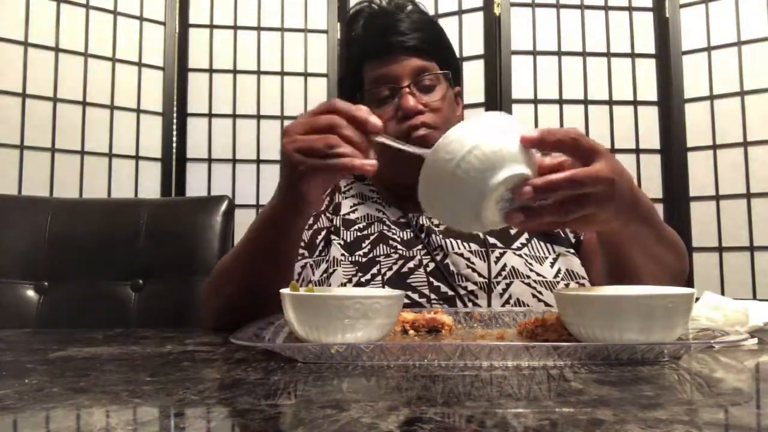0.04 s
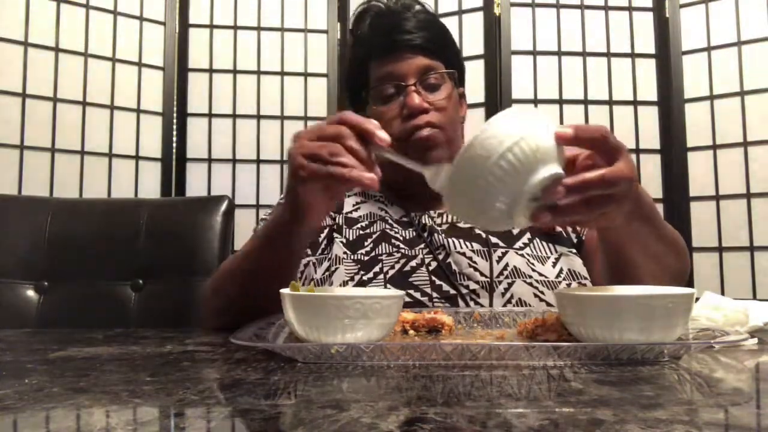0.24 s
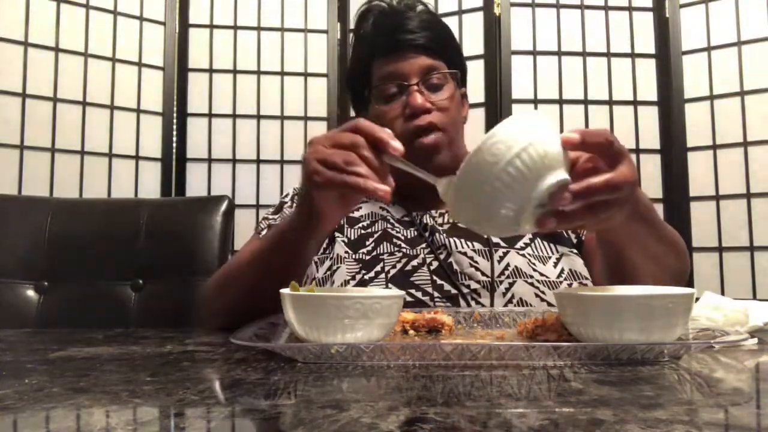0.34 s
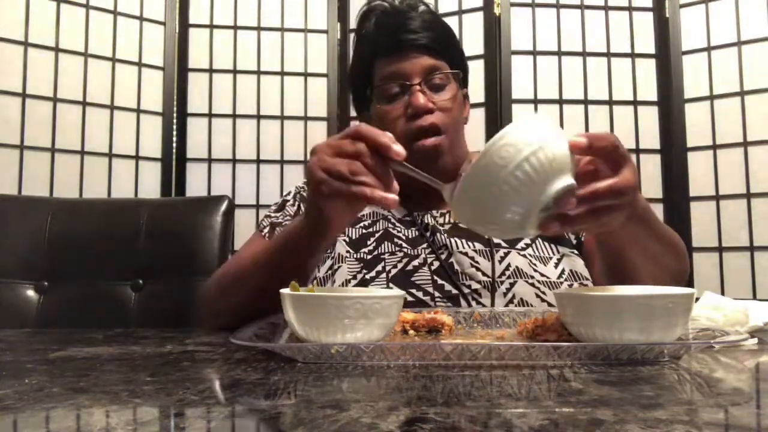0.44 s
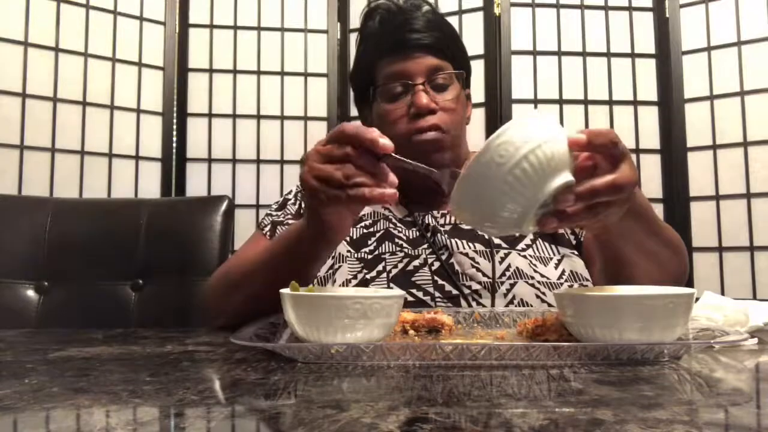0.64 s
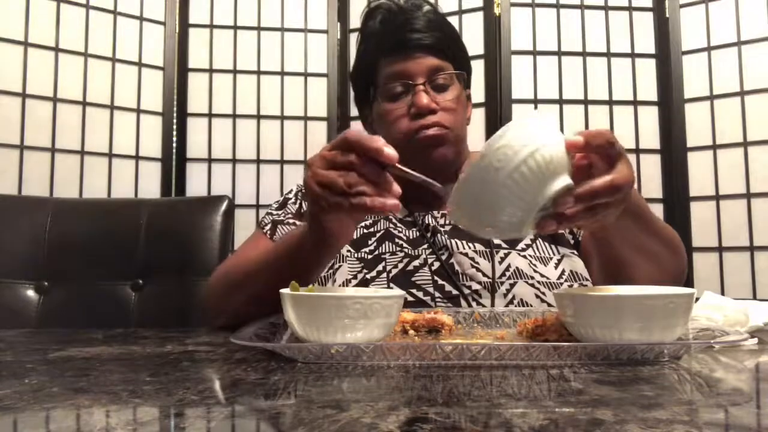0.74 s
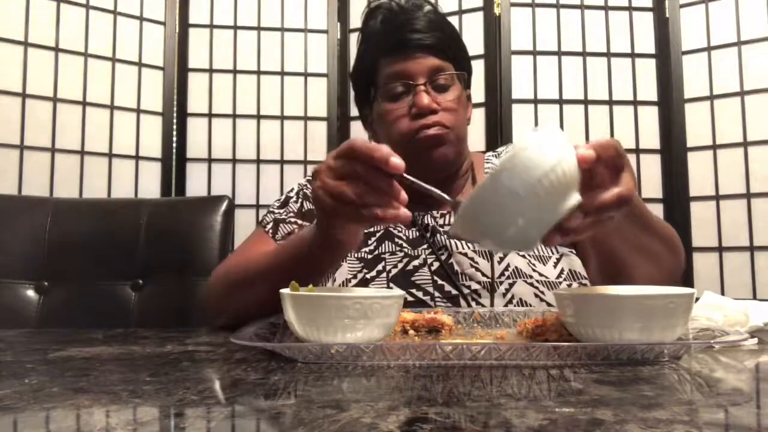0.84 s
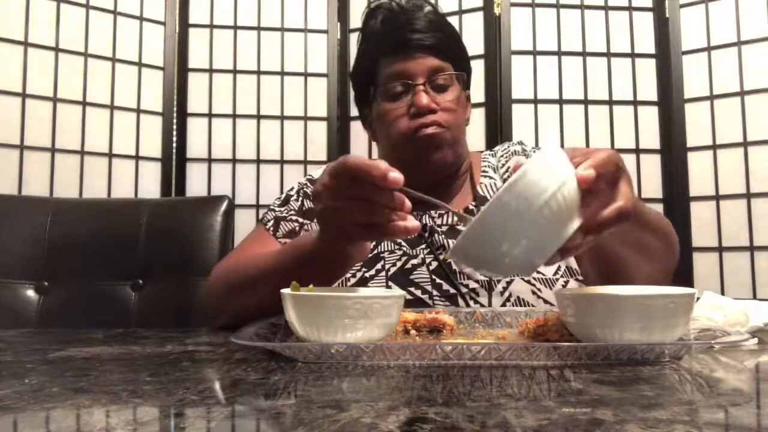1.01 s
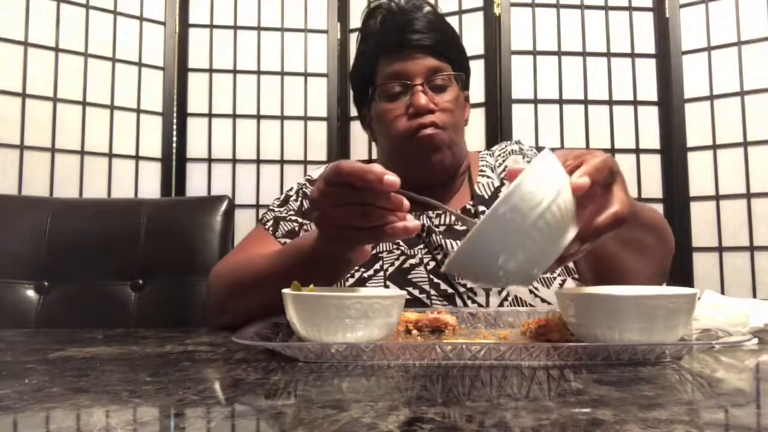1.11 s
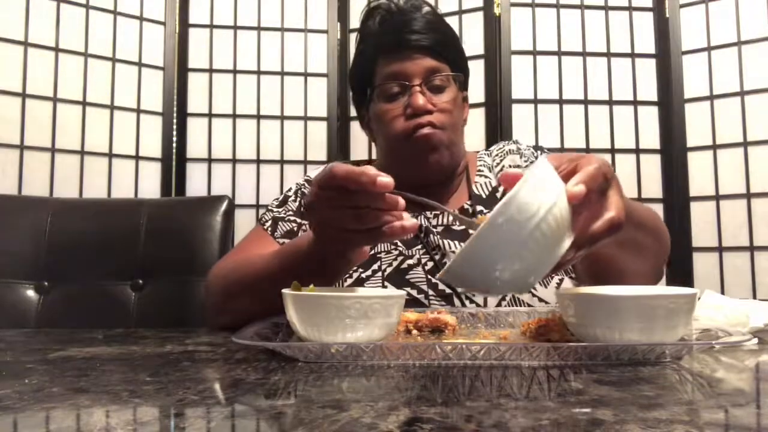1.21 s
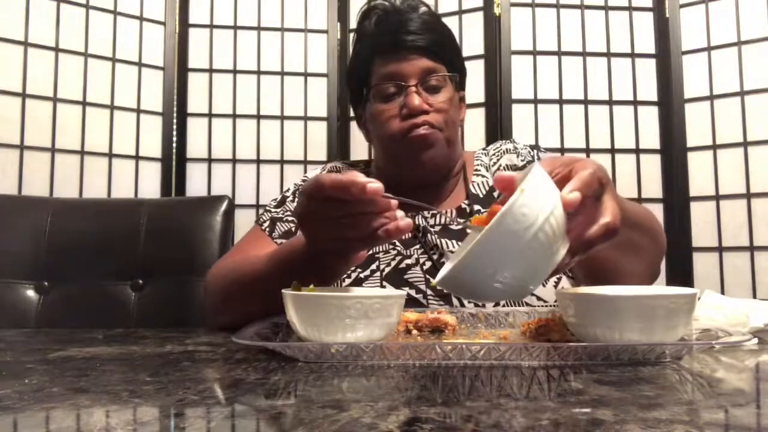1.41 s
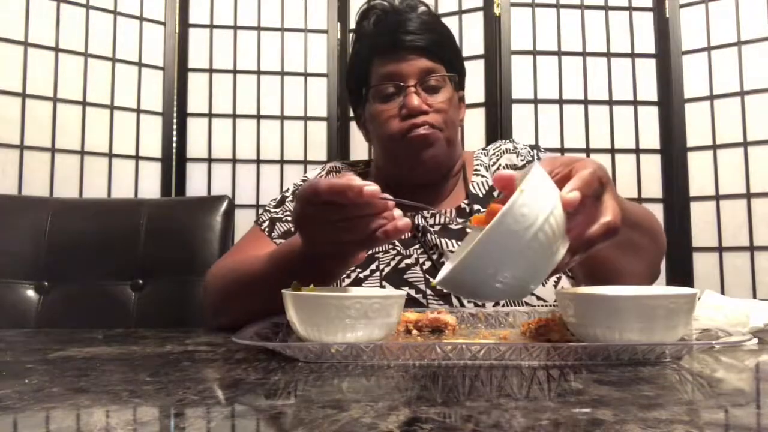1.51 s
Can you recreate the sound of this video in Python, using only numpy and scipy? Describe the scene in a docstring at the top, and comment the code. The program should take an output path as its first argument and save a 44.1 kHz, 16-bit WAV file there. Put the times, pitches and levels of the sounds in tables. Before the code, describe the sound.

A steel fork clinks and scrapes in a ceramic bowl of soft food. A soft rub leads to a bright, quickly damped double clink at 0.2 seconds, then a light scrape and a wet knock near 0.4. Clinks come at 0.6 and 0.95, with a sharp tick between. Faint scrapes, squeaks and taps finish around 1.3 seconds. A low fan hum fills the small room throughout.

```python
"""A steel fork scoops soft food from a hand-held ceramic bowl in a small room.
A soft rub leads to a bright double clink at 0.2 s; the hand damps the bowl's ring quickly.
A light scrape follows, then at 0.43 s the tines tick and knock through the food with a wet crackle.
More rubs, clinks at 0.6 and 0.95 s and a sharp tick between; faint scrapes, squeaks and taps end it.
Throughout, the room carries each contact on over air noise and the low hum of a ventilation fan."""
import sys
import numpy as np
from scipy import signal
from scipy.fft import rfft, irfft
from scipy.io import wavfile

SR = 44100
rng = np.random.default_rng(int(sys.argv[2]) if len(sys.argv) > 2 else 0)


def put_to_file(sound):
    """Save the sound as 16-bit audio at rate SR, in the file named by the first command-line argument."""
    columns = np.atleast_2d(sound).T  # one column per channel
    safe = np.clip(columns, -1, 1)
    whole_steps = np.round(safe * 32767)
    wavfile.write(sys.argv[1], SR, whole_steps.astype(np.int16))


N = 68355
T, FREQS = np.arange(N) / SR, np.fft.rfftfreq(N, 1 / SR)
CONTACT_T = T[:SR // 4]

# fork on bowl: t/s, 6 x gain/dB at FAMILY_HZ, decay scale, crack level/dB, crack cut-off/Hz
CLINKS = [(0.216, -16.5, -13, -12, -20.5, -23.5, -19, 0.96, -15, 16600),
          (0.2192, -28, -20.5, -22, -20, -24, -31, 0.67, -26, 16300),
          (0.3132, -50, -36.5, -37, -33, -51, -60, 0.62, -54, 9000),
          (0.3376, -57, -35, -42, -32, -52, -55, 0.41, -39.5, 10800),
          (0.6124, -22, -29, -40, -20, -40.5, -44, 0.51, -25.5, 5200),
          (0.7819, -30.5, -45.5, -60, -39, -56.5, -57, 0.79, -41.5, 9000),
          (.9528, -23, -28.5, -27.5, -22.5, -32.5, -44, 0.45, -21, 4500),
          (1.233, -56, -58, -66, -58, -63, -73, 0.83, -43, 4300),
          (1.2839, -43, -44, -48, -46.5, -50, -54, 0.64, -37, 4900),
          (1.3263, -59, -50.5, -65, -58, -61, -64, 1, -50, 4480)]
# contact crack spectrum: f/Hz, gain/dB
CRACK_EQ = [(300, -37.5), (800, -1), (1250, -10), (1600, -4), (2700, 4.5), (3150, -6.5), (4000, 3.5),
            (5500, 0.5), (8300, -3), (12500, 0), (16000, -14)]
def clinks(crack_t60_s=.026):
    """Each blow cracks and rings the bowl; food dulls the crack and shortens the ring."""
    out = np.zeros(N)
    for start, *family_db, decay_scale, crack_db, cut_hz in CLINKS:
        crack = burst(crack_db, crack_t60_s * decay_scale, CRACK_EQ)
        dulling = 1 / np.sqrt(1 + (FREQS / cut_hz) ** 6)
        out += at(start, bowl(decay_scale, family_db) + colour(crack, dulling))
    return out


# bowl modes: f/Hz
BOWL_HZ = [1665, 2480, 3812, 3834, 4130, 5314, 5887, 6492, 6660, 6790, 10110, 10450, 11425, 12900, 14190,
           14780]
# per mode: relative level/dB
BOWL_DB = [-2, -17.5, 1, -32.5, -17, -17.5, -15.5, -1.5, -7, 0.5, -0.5, -9.5, -16, -4.5, -4, -0.5]
# per mode: unscaled t60/s
BOWL_T60_S = [0.025, 0.035, 0.041, 0.42, 0.027, .06, .05, 0.058, 0.077, 0.056, 0.047, 0.061, 0.026, 0.029,
              0.039, 0.03]
def bowl(decay_scale, family_db):
    """The hand-damped bowl rings; each contact spot favours other modes."""
    return ring(zip(BOWL_HZ, BOWL_DB, BOWL_T60_S), decay_scale, family_db)


# mode family centres: f/Hz
FAMILY_HZ = [1700, 3800, 6500, 6750, 10000, 14000]
def ring(modes, decay_scale=1, family_db=0, push_s=.00044):
    """Damped modes build up during the push of the contact."""
    favour = list(zip(FAMILY_HZ, np.broadcast_to(family_db, len(FAMILY_HZ))))
    tones = 0
    for hz, db, t60 in modes:
        envelope = undb(db + along(favour, hz)) * fade(t60 * decay_scale)
        tones += envelope * np.sin(2 * np.pi * hz * CONTACT_T)
    return tones * (1 - np.exp(-CONTACT_T / push_s))


# tine ticks: t/s, level/dB
TICKS = [(.3385, -42), (0.434, -33.5), (0.466, -56), (0.671, -50), (0.7824, -21.5)]
# tine modes: f/Hz, relative level/dB, t60/s
TINE_MODES = [(6615, -8.5, 0.016), (7800, -5, 0.0074), (8390, -7, 0.017), (8910, -1, 0.0082),
              (13400, -11, 0.0056), (15100, -6, 0.01)]
def ticks():
    """The tines ping briefly as they flick off the glaze."""
    return sum(at(start, undb(db) * ring(TINE_MODES)) for start, db in TICKS)


# fork through food: t/s, level/dB, thud t60/s
KNOCKS = [(0.4399, -29, 0.025), (0.557, -55.5, 0.015)]
# thud spectrum: f/Hz, gain/dB
THUD_EQ = [(60, -21), (150, -7), (350, 10.5), (750, 1.5), (1150, -4.5), (1700, 0), (2600, -7), (3700, 0),
           (4600, -7.5), (5700, -21), (7500, -14), (16000, -18)]
# hollow ring: f/Hz, relative level/dB, t60/s
KNOCK_MODES = [(405, -11, 0.036), (702, -2, 0.02), (1675, -3.5, 0.014), (2470, -3, 0.025),
               (3326, 2.5, 0.01)]
def knocks():
    """A cushioned blow gives a thud with a short hollow ring."""
    hollow = ring(KNOCK_MODES)
    return sum(at(start, burst(db, t60, THUD_EQ) + undb(db) * hollow) for start, db, t60 in KNOCKS)


# wet crackles: t/s, level/dB, t60/s
CRACKLES = [(.4348, -39, 0.02), (.4390, -30.5, 0.023), (.4645, -46, 0.016)]
# crackle spectrum: f/Hz, gain/dB
CRACKLE_EQ = [(1000, 0.5), (3000, 13), (5800, -33), (7300, 7.5), (11000, 0), (15500, 5)]
def crackles():
    """Wet food crackles in short bright bursts."""
    return sum(at(start, burst(db, t60, CRACKLE_EQ)) for start, db, t60 in CRACKLES)


# fork along glaze: t/s, length/s, level/dB
SCRAPES = [(0.256, 0.14, -55), (0.947, 0.28, -65), (1.238, 0.1, -61)]
# scraped bowl: gain/dB at FAMILY_HZ
SCRAPE_FAMILY_DB = [1, -5, -19.5, -1, -14, -9]
# grit spectrum: f/Hz, gain/dB
GRIT_EQ = [(900, -13.5), (1450, 2.5), (2400, -1), (3100, -0.5), (4200, 2.5), (5500, -6.5), (7300, -3.5),
           (9000, -16), (16000, -27.5)]
def scrapes(slips_per_s=1500, spread_db=4.5, grit_db=1):
    """Uneven tiny slips grate on the glaze and keep the bowl ringing."""
    slipping = rng.random(N) < slips_per_s / SR
    slips = unit(slipping * undb(spread_db * rng.standard_normal(N)))
    pressure = sum(undb(db) * stroke(start, length) for start, length, db in SCRAPES)
    body = bowl(decay_scale=.6, family_db=SCRAPE_FAMILY_DB)
    ringing = signal.fftconvolve(slips * pressure, body / np.linalg.norm(body))[:N]
    grit = undb(grit_db) * pressure * unit(colour(slips, gains(GRIT_EQ)))
    return ringing + grit


# fork pushing food: t/s, length/s, level/dB
RUBS = [(0.011, 0.038, -50.5), (0.532, 0.15, -49.5), (1.051, 0.033, -53.5)]
# rub spectrum: f/Hz, gain/dB
RUB_EQ = [(300, -10), (550, -4), (740, 3.5), (950, -2), (1300, -25.5), (3000, -21), (8000, -51)]
def rubs():
    """Food pushed along the bowl makes a soft hollow rustle."""
    pressure = sum(undb(db) * stroke(start, length) for start, length, db in RUBS)
    return pressure * noise(gains(RUB_EQ))


# tine squeaks: t/s, length/s, f/Hz, level/dB
SQUEAKS = [(0.845, 0.035, 1600, -56), (1.217, 0.11, 1297, -58)]
def squeaks(width_hz=40):
    """The tines squeak briefly in a narrow band."""
    return sum(undb(db) * stroke(start, length) * band(hz, width_hz) for start, length, hz, db in SQUEAKS)


# tail spectrum: f/Hz, gain/dB
ROOM_EQ = [(200, -18), (1000, -16), (2500, -6.5), (4000, -6), (6700, -9.5), (10000, -9), (16000, -3.5)]
# tail decay: f/Hz, t60/s
ROOM_DECAY = [(300, 0.84), (3500, 0.17), (8000, 0.29), (15000, 0.1)]
def room(x, gap_s=.005):
    """Diffuse tail whose treble dies first."""
    centres_hz = np.geomspace(200, 16000, 6)
    t = T[:SR // 2]
    tail, freqs = 0, np.fft.rfftfreq(len(t), 1 / SR)
    for hz in centres_hz:
        share = np.sqrt(along([(c, c == hz) for c in centres_hz], freqs))
        part = irfft(share * np.exp(2j * np.pi * rng.random(len(freqs))), len(t))
        part *= fade(along(ROOM_DECAY, hz), t)
        tail += part / np.linalg.norm(part) * np.sqrt(np.mean(share ** 2))
    return at(gap_s, signal.fftconvolve(x, colour(tail, gains(ROOM_EQ))))


# fan hum: f/Hz, width/Hz, level/dB
HUM_BANDS = [(55.05, 0.75, -64.5), (171.2, 10, -56.5), (218.7, 5.4, -54), (247.8, 4.6, -57.5),
             (371.3, 4, -64)]
def fan():
    """A ventilation fan hums in low wavering bands."""
    return sum(undb(db) * band(hz, width_hz) for hz, width_hz, db in HUM_BANDS)


# air spectrum: f/Hz, gain/dB
AIR_EQ = [(18, -37), (30, -23.5), (98, -9), (227, -2.5), (303, -3), (461, -6.5), (866, -17), (1430, -21),
          (2120, -27), (3670, -29.5), (6050, -37), (6900, -30), (8520, -42), (14400, -44), (16000, -50)]
def air(level_db=-50.5):
    """Soft steady air noise."""
    return undb(level_db) * noise(gains(AIR_EQ))


def undb(db):
    """Decibels to gain."""
    return 10 ** (np.asarray(db) / 20)


def unit(x):
    """Scale to rms 1."""
    return x / (np.std(x) + 1e-18)


def along(points, hz):
    """Interpolate (f/Hz, value) points on a log-frequency axis."""
    p = np.array(points, float)
    return np.interp(np.log(np.maximum(hz, 1)), np.log(p[:, 0]), p[:, 1])


def gains(eq):
    """Linear gain of a spectrum at FREQS."""
    return undb(along(eq, FREQS))


def colour(x, gain, size=2048):
    """Minimum-phase filter with the given gain at FREQS."""
    coarse_gain = np.interp(np.fft.rfftfreq(size, 1 / SR), FREQS, gain)
    cepstrum = irfft(np.log(coarse_gain + 1e-6))
    cepstrum[1:size // 2] *= 2
    cepstrum[size // 2:] = 0
    return signal.fftconvolve(x, irfft(np.exp(rfft(cepstrum))))[:len(x)]


def noise(gain):
    """Noise of rms 1, shaped by the gain at FREQS."""
    return unit(irfft(np.exp(2j * np.pi * rng.random(len(FREQS))) * gain, N))


def band(hz, width_hz):
    """Noise in one narrow resonance."""
    return noise(1 / (1 + ((FREQS - hz) / width_hz) ** 2))


def burst(db, t60_s, eq):
    """One short noisy impact."""
    hiss = colour(rng.standard_normal(len(CONTACT_T)), gains(eq))
    return undb(db) * fade(t60_s) * unit(hiss)


def fade(t60_s, t=CONTACT_T):
    """Exponential decay."""
    return np.exp(-np.log(1000) * t / max(t60_s, 1e-3))


def stroke(start_s, length_s):
    """Rise and fall of one movement."""
    progress = np.clip((T - start_s) / length_s, 0, 1)
    return np.sqrt(np.abs(np.sin(np.pi * progress)))


def at(start_s, x):
    """Place a sound on the timeline."""
    return np.pad(x, (max(int(start_s * SR), 0), N))[:N]


def scene(tick_send_db=-1.5, dull_send_db=6):
    """Fork, bowl and food in the room, mono."""
    bright = clinks() + scrapes() + squeaks() + crackles()
    tines, dull = ticks(), knocks() + rubs()
    tail = room(bright + undb(tick_send_db) * tines + undb(dull_send_db) * dull)
    return (bright + tines + dull + tail + air() + fan())[None]


def record(dry):
    """A steep low-pass cuts the top treble."""
    top_hz = 16100
    return signal.sosfilt(signal.ellip(8, .2, 80, top_hz, fs=SR, output="sos"), dry)


dry = scene()
out = record(dry)
put_to_file(out)
```